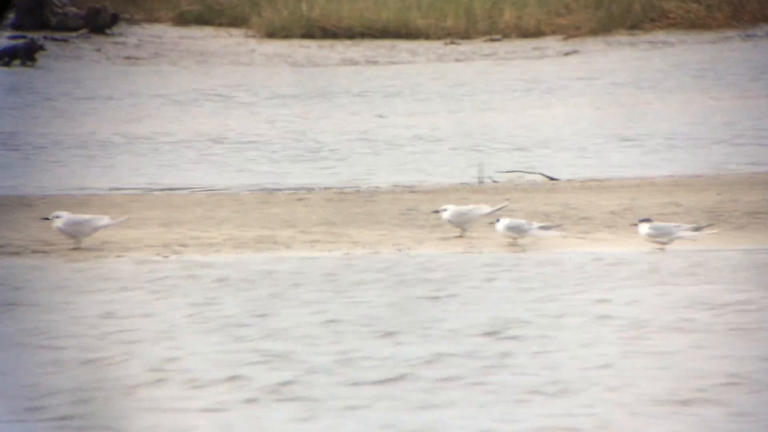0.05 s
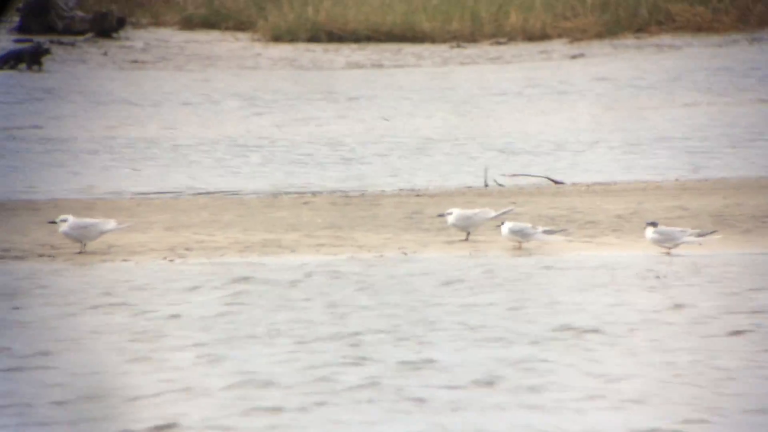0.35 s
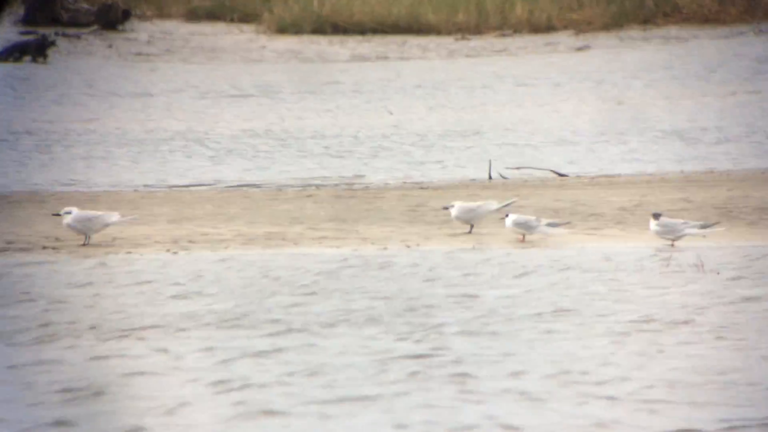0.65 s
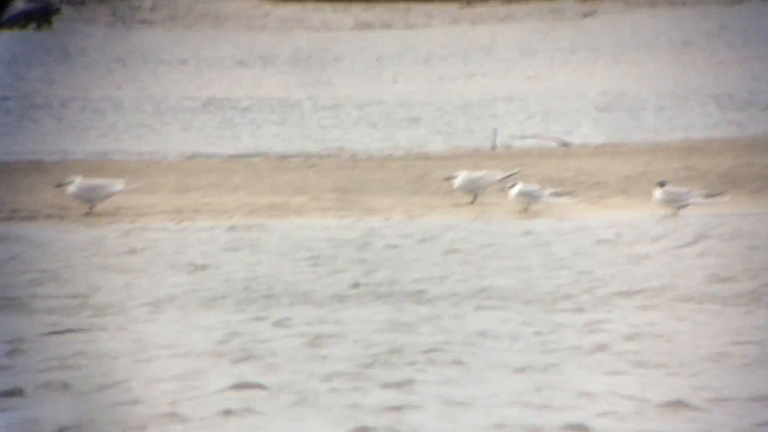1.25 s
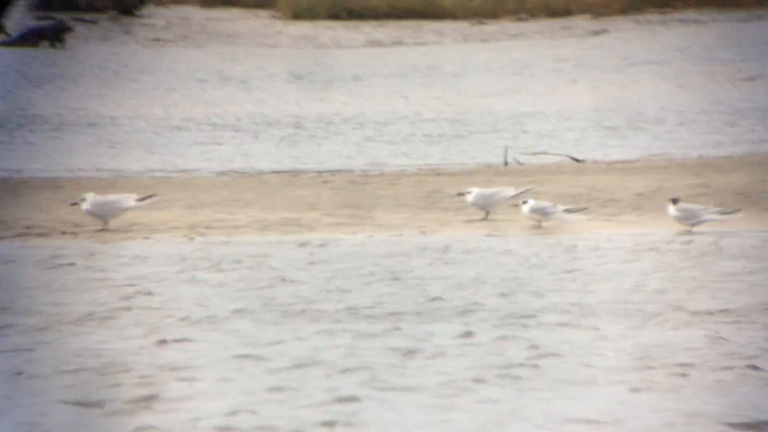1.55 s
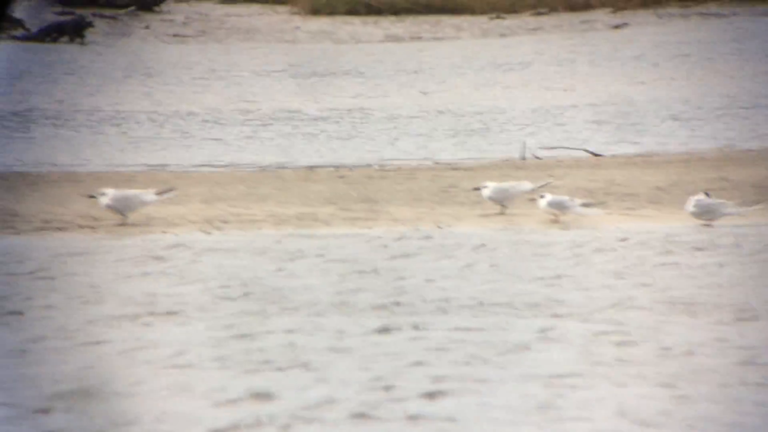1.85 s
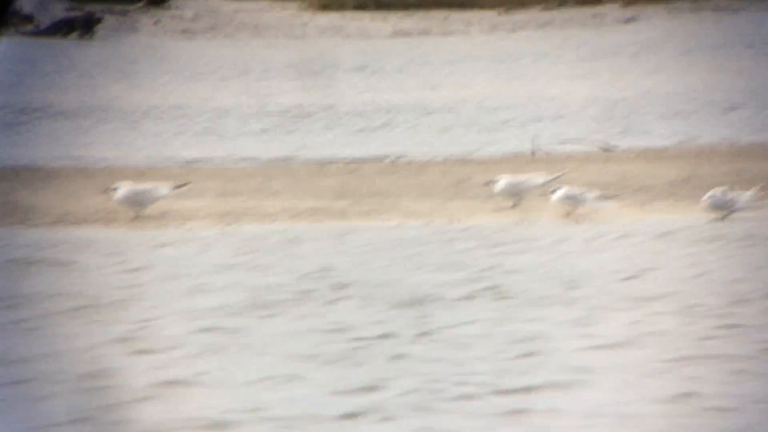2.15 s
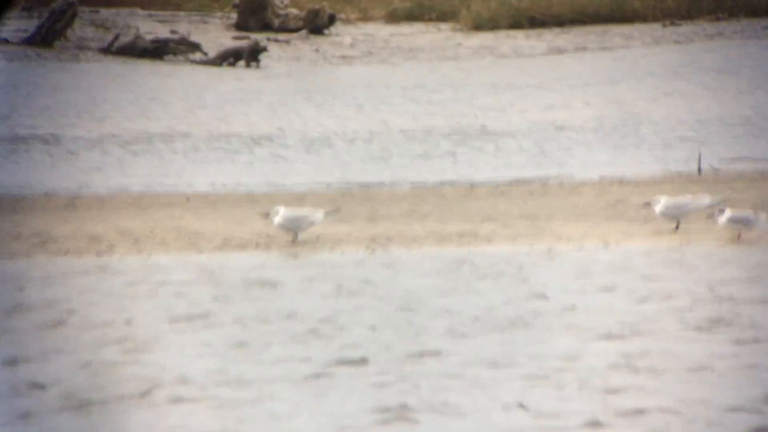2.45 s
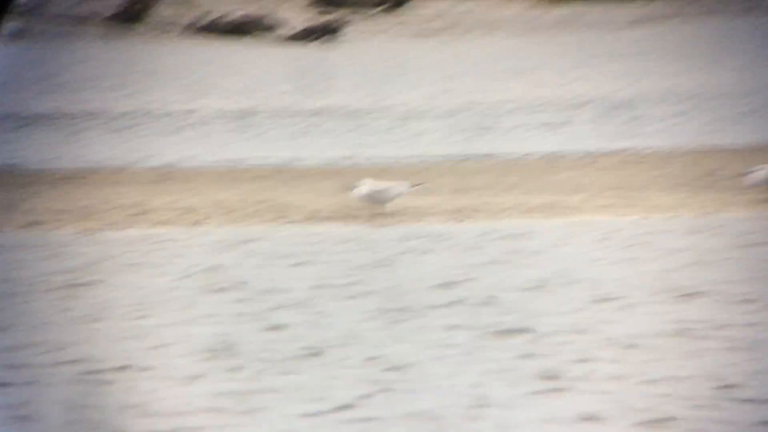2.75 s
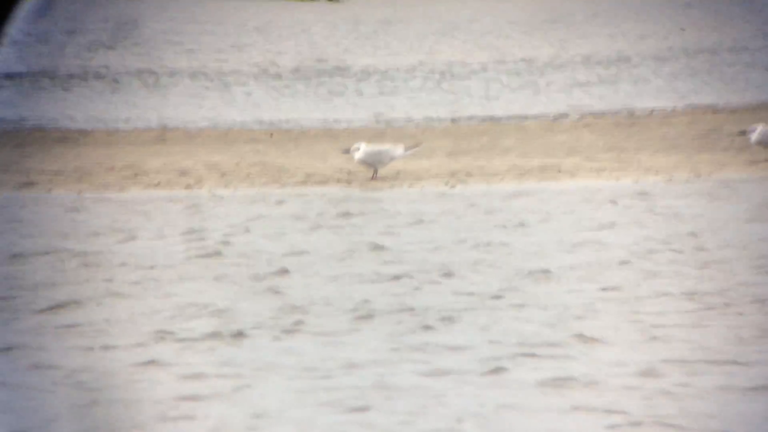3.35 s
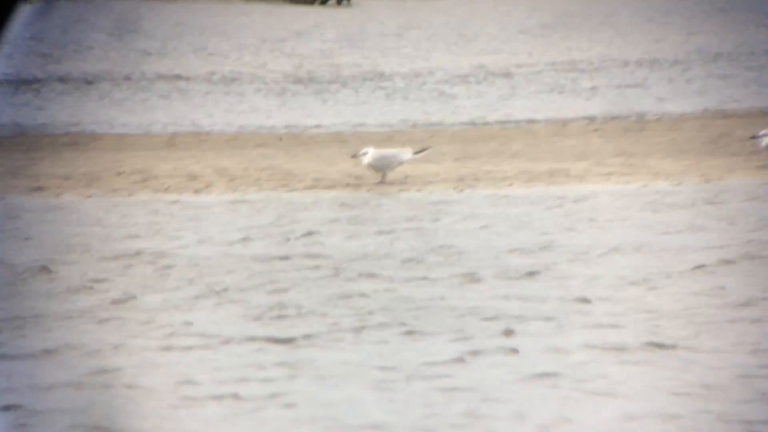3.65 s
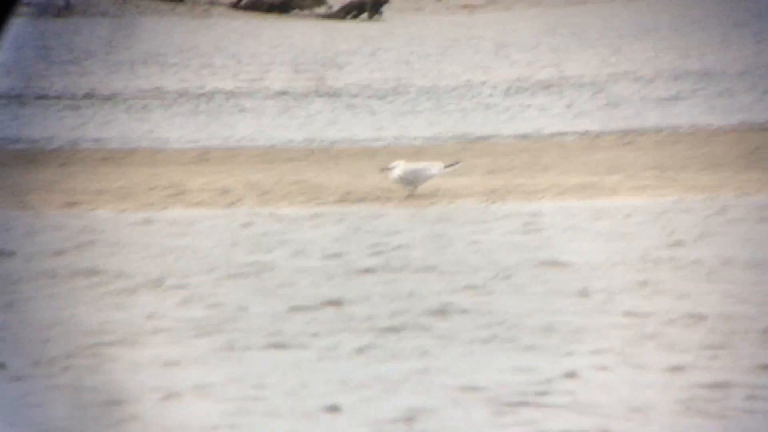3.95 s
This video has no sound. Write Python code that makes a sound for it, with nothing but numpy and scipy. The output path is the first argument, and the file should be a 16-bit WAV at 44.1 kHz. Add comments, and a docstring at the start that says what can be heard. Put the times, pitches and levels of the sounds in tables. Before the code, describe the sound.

Wind buffeting the microphone in uneven gusts, with a low rumble and dull thumps.

```python
"""Wind buffeting one small microphone, out by open water and a sandbar.
Turbulence right on the microphone port rumbles in gusts, and single eddies thump against it.
Air streaming past adds a softer rush and small puffs; smoother wind comes from farther over the water.
Far below the wind are a few tiny close ticks, a thin insect-like buzz and one faint, distant bird chirp."""
import sys
import numpy as np
from scipy import signal
from scipy.fft import rfft, irfft, next_fast_len
from scipy.io import wavfile
from scipy.ndimage import uniform_filter1d, map_coordinates

SR = 44100
rng = np.random.default_rng(int(sys.argv[2]) if len(sys.argv) > 2 else 0)


def wav_out(sig):
    """Save sig, one row per channel (or a flat mono array), as 16-bit PCM at SR to the path in sys.argv[1]."""
    wavfile.write(sys.argv[1], SR, np.round(np.clip(np.atleast_2d(sig).T, -1, 1) * 32767).astype(np.int16))


N = 176400

# wind far out over the water (time [s], relative level [dB])
FAR_WIND_LEVELS = [(.03, -55.5), (.8, -53), (.98, -53), (1.12, -62), (1.3, -58), (1.6, -64.5),
                   (1.85, -57.5), (2.1, -61.5), (2.45, -58), (2.7, -56.5), (2.78, -54), (2.9, -58.5),
                   (3.08, -53), (3.18, -66), (3.38, -58.5), (3.53, -58), (3.97, -55.5)]
# its spectrum (frequency [Hz], relative level [dB])
FAR_WIND_SPECTRUM = [(100, -9.5), (500, -1.5), (850, 2), (1150, -4.5), (1500, -13), (2000, -24.5),
                     (2700, -42), (4400, -59), (9000, -76.5)]
# airy wash on top of the far wind (time [s], level [dB])
WASH_LEVELS = [(.03, -64), (.5, -64.5), (.93, -62.5), (.99, -58), (1.05, -63.5), (1.27, -63), (1.38, -63),
               (1.6, -63.5), (1.95, -63.5), (2.0, -59.5), (2.09, -67), (2.22, -61), (2.36, -62.5),
               (2.62, -63.5), (2.66, -59.5), (2.73, -62.5), (3.01, -59.5), (3.09, -66), (3.38, -65),
               (3.6, -59.5), (3.8, -64), (3.97, -61)]
# its spectrum (frequency [Hz], relative level [dB])
AIRY_SPECTRUM = [(300, -11.5), (1000, -1), (1600, 0.5), (2000, -5), (2350, -9), (2700, -16), (3300, -14),
                 (3800, -15), (4400, -26.5), (6000, -29.5), (9000, -41.5)]
# faint steady hiss (frequency [Hz], relative level [dB])
HISS_SPECTRUM = [(100, 5), (2000, 2), (3700, 1.5), (4600, 0.5), (8000, 0), (12000, -0.5), (16000, -2)]
# notes of the distant bird (start [s], length [s], top pitch [Hz], level [dB])
CHIRP_NOTES = [(3.557, .02, 3800, -66), (3.575, 0.055, 3640, -65.5)]
# spells of thin buzzing (start [s], length [s], level [dB])
BUZZ_SPELLS = [(.8, .04, -92), (1.19, .06, -86), (1.47, .03, -80), (1.766, 0.024, -78), (1.896, .19, -79.5)]
# ticks at the microphone (time [s], ring peak [dB], dull body against that peak [dB])
CLOSE_TICKS = [(0.9973, -46, -14), (1.4445, -55.5, -15), (1.4655, -43, 0.5), (2.8284, -45.5, -19),
               (3.5503, -54, -28)]
# ring of a tick (frequency [Hz], relative level [dB], time to fall 60 dB [s])
TICK_RING = [(9270, -15.5, 0.0054), (10700, -7, .002), (12070, -8.5, 0.0044), (12800, -2.5, .002),
             (14200, -3, .002), (15300, -7.5, .002)]
# air rushing past the port (time [s], relative level [dB])
RUSH_LEVELS = [(.03, -42.5), (.6, -43.5), (.67, -42.5), (.78, -49), (.85, -35.5), (.9, -45), (1.0, -38),
               (1.15, -46.5), (1.22, -42), (1.32, -42.5), (1.38, -47.5), (1.45, -42), (1.52, -48.5),
               (1.7, -46.5), (1.8, -39), (1.9, -42), (1.99, -39), (2.11, -48), (2.2, -42), (2.5, -42),
               (2.72, -41.5), (2.78, -47), (2.81, -34.5), (3.0, -39.5), (3.15, -43.5), (3.33, -48.5),
               (3.5, -43), (3.61, -35), (3.75, -40), (3.97, -42.5)]
# its spectrum (frequency [Hz], relative level [dB])
RUSH_SPECTRUM = [(60, -10), (200, -7.5), (350, -2.5), (500, 1), (750, -3.5), (1000, -16.5), (1400, -26),
                 (2000, -38), (2700, -54), (3600, -51), (4400, -62), (9000, -72.5)]
# small puffs of turbulence (time [s], level [dB], centre [Hz])
AIR_PUFFS = [(1.285, -38, 520), (1.325, -38.5, 650), (1.456, -43.5, 860), (1.85, -34, 597),
             (2.007, -32.5, 462), (2.175, -44.5, 950), (2.563, -41.5, 800), (2.668, -38, 707),
             (2.703, -39.5, 740), (2.76, -38.5, 550), (2.9, -38, 880), (3.575, -38, 480), (3.665, -40, 520)]
# single eddies hitting the port (time [s], peak [dB], centre [Hz])
EDDY_HITS = [(0.237, -23, 70), (.425, -24, 65), (.675, -23.5, 58), (0.829, -28.5, 75), (0.968, -15.5, 68),
             (.985, -14.5, 148), (1.008, -24.5, 63), (1.208, -21.5, 55.6), (1.23, -21, 95),
             (1.361, -21.5, 107), (1.444, -17.5, 84.5), (1.792, -10, 79), (1.887, -20, 60),
             (1.989, -6.5, 81.7), (2.006, -19, 110), (2.075, -17.5, 152), (2.183, -15.5, 77.7),
             (2.345, -22.5, 69), (2.522, -20, 101), (2.623, -12.5, 94), (2.695, -16, 75.6),
             (2.993, -16, 100), (3.572, -18, 105.6), (3.609, -9.5, 134), (3.668, -19, 160),
             (3.733, -20, 86), (3.797, -21.5, 92)]
# gusts on the port (time [s], relative level [dB])
GUST_LEVELS = [(0, -28.5), (.24, -32.5), (.31, -32.5), (.43, -31.5), (.53, -34), (.66, -26.5), (.77, -37.5),
               (.84, -25), (.89, -32.5), (.98, -20.5), (1.08, -37), (1.16, -34.5), (1.23, -23.5),
               (1.31, -33.5), (1.45, -31.5), (1.52, -46), (1.66, -43), (1.8, -29.5), (1.94, -35.5),
               (2.06, -29), (2.13, -34), (2.3, -28.5), (2.55, -30.5), (2.66, -30.5), (2.82, -32.5),
               (2.99, -27), (3.09, -36), (3.22, -27.5), (3.37, -41), (3.44, -34), (3.54, -30), (3.6, -27.5),
               (3.7, -26), (3.87, -34.5), (4, -22.5)]
# their rumble (frequency [Hz], relative level [dB])
RUMBLE_SPECTRUM = [(15, -47), (28, -26), (46, -2.5), (65, 2), (115, 0), (180, -7.5), (270, -17),
                   (450, -29.5), (900, -42), (2000, -55.5), (4000, -82)]


def amp(db):
    """Decibels to gain."""
    return 10 ** (np.asarray(db) / 20)


def unit(x):
    """Scale to rms 1."""
    return x / np.sqrt(np.mean(x ** 2) + 1e-20)


def curve(rows):
    """(time [s], value) rows joined by straight lines."""
    return np.interp(np.arange(N) / SR, *np.transpose(rows))


def wobble(per_s):
    """A smooth random curve with per_s knots a second."""
    knots = rng.standard_normal(int(N * per_s / SR) + 4)
    return map_coordinates(knots, [np.arange(N) * per_s / SR])


def filtered(x, response):
    """Filter x by a gain given as a function of frequency."""
    size = next_fast_len(N + 8192)
    return irfft(rfft(x, size) * response(np.fft.rfftfreq(size, 1 / SR)), size)[:N]


def noise(spectrum, patchy_db):
    """Coloured noise of rms 1 with brief patches of random gain."""
    cells = signal.stft(rng.standard_normal(N), nperseg=512)[2]
    patches = uniform_filter1d(rng.standard_normal(cells.shape), size=5, axis=0)
    patches = uniform_filter1d(patches, size=6, axis=1)
    white = signal.istft(cells * amp(patchy_db * unit(patches)), nperseg=512)[1][:N]
    hz, db = np.transpose(spectrum)
    return unit(filtered(white, lambda f: amp(np.interp(np.log(f + 1), np.log(hz), db))))


def evened(x, samples):
    """Take the slow swells out of a noise, so that a level curve can shape it."""
    return x / np.sqrt(np.abs(uniform_filter1d(x ** 2, size=samples)) + 1e-6)


def far_wind(body_gain_db=6.5, hiss_db=-75):
    """Smoother wind from far over the water, its airy top, and a steady faint hiss."""
    body = noise(FAR_WIND_SPECTRUM, patchy_db=1.07) * amp(curve(FAR_WIND_LEVELS) + body_gain_db)
    wash = noise(AIRY_SPECTRUM, patchy_db=2) * amp(curve(WASH_LEVELS))
    hiss = noise(HISS_SPECTRUM, patchy_db=1.9) * amp(hiss_db)
    return body + wash + hiss


def bird(arch_hz=395, waver_hz=60):
    """A bird far off: one slightly rough chirp whose two notes arch up and down."""
    out = np.zeros(N + SR)
    waver = waver_hz * wobble(600)
    for time, length, top_hz, db in CHIRP_NOTES:
        start = round(time * SR)
        arc = np.linspace(-1, 1, int(length * SR))
        pitch = top_hz - arch_hz * arc ** 2 + waver[start:start + len(arc)]
        tone = np.sin(2 * np.pi * np.cumsum(pitch) / SR)
        out[start:][:len(arc)] += amp(db) * np.cos(np.pi * arc / 2) * tone
    return out[:N]


def buzz(pitch_hz=11490, waver_hz=110, flicker_db=2.5, fade_s=.008):
    """A very high, wavering, insect-like tone in short, faint spells."""
    t = np.arange(N) / SR
    pitch = pitch_hz + waver_hz * wobble(400)
    tone = unit(np.sin(2 * np.pi * np.cumsum(pitch) / SR) * amp(flicker_db * wobble(90)))
    spells = sum(amp(db) * np.clip(np.minimum(t - start, start + length - t) / fade_s, 0, 1)
                 for start, length, db in BUZZ_SPELLS)
    return tone * spells


def ticks(attack_s=.0002, body_cutoff_hz=4180, body_t60_s=.005):
    """Tiny ticks right at the microphone: a short, bright ring over a duller crack."""
    out, t = np.zeros(N + SR), np.arange(SR // 50) / SR
    lowpass = signal.butter(2, body_cutoff_hz, fs=SR)
    for time, db, body_db in CLOSE_TICKS:
        ring = sum(amp(level - 60 * t / t60) * np.sin(2 * np.pi * (hz * t + rng.random()))
                   for hz, level, t60 in TICK_RING)
        ring *= 1 - np.exp(-t / attack_s)
        body = signal.lfilter(*lowpass, rng.standard_normal(len(t)))
        body *= amp(body_db - 60 * t / body_t60_s)
        out[round(time * SR):][:len(t)] += amp(db) * (ring / np.abs(ring).max() + body)
    return out[:N]


def spatter(per_s=24, lowest_hz=500, attack_s=.00072, t60_s=.0076, spread_db=7.1):
    """Random flicks of air at the port, a few cycles each, scattered over one octave."""
    out, t = np.zeros(N + SR), np.arange(SR // 40) / SR
    envelope = amp(-60 * t / t60_s) * (1 - np.exp(-t / attack_s)) ** 2
    for when, octave, strength in rng.random((int(per_s * N / SR), 3)):
        flick = np.sin(2 * np.pi * lowest_hz * 2 ** octave * t) * envelope
        out[int(when * N):][:len(t)] += amp(spread_db * strength) * flick / np.abs(flick).max()
    return out[:N]


def rush(gain_db=-2.5, flutter_db=.06, spatter_gain_db=4):
    """Air streaming close past the microphone, with a spatter of flicks in it."""
    stream = evened(noise(RUSH_SPECTRUM, patchy_db=3.5), samples=4000)
    air = stream + amp(spatter_gain_db) * spatter()
    return air * amp(curve(RUSH_LEVELS) + gain_db + flutter_db * wobble(70))


def puffs(half_width_s=.0071, half_width_octaves=.3):
    """Small vortices, heard as brief swells of narrow noise."""
    out, t = np.zeros(N + SR), np.arange(-2400, 2400) / SR
    hz = np.fft.rfftfreq(len(t), 1 / SR) + 1
    swell = np.exp(-.5 * (t / half_width_s) ** 2)
    swell_rms = np.sqrt(np.mean(swell ** 2))
    for time, db, centre_hz in AIR_PUFFS:
        passband = np.exp(-.5 * (np.log2(hz / centre_hz) / half_width_octaves) ** 2)
        band = irfft(rfft(rng.standard_normal(len(t))) * passband)
        out[round((time + t[0]) * SR):][:len(t)] += amp(db) * unit(band * swell) * swell_rms
    return out[:N]


def eddies(half_width_cycles=.4):
    """Each eddy thumps the port: one short push of pressure with a suction on either side."""
    out, t = np.zeros(N), np.arange(N) / SR
    for time, db, hz in EDDY_HITS:
        cycles = (t - time) * hz
        envelope = np.exp(-.5 * (cycles / half_width_cycles) ** 2)
        out += amp(db) * np.cos(2 * np.pi * cycles) * envelope
    return out


def rumble(gain_db=-1.5, flutter_db=3):
    """Turbulence right on the microphone port follows the gusts and flutters quickly."""
    turbulence = evened(noise(RUMBLE_SPECTRUM, patchy_db=1.5), samples=2800)
    return turbulence * amp(curve(GUST_LEVELS) + gain_db + flutter_db * wobble(35))


def scene():
    """One microphone by the water: wind on the port in front, everything else beneath it."""
    close_wind = rumble() + eddies() + puffs() + rush()
    background = far_wind() + ticks() + buzz() + bird()
    return (close_wind + background)[None]


def record(dry):
    """The recorder keeps nothing above its band limit."""
    top_hz = 16000
    return np.array([filtered(channel, lambda hz: hz < top_hz) for channel in dry])


dry = scene()
out = record(dry)
wav_out(out)
```